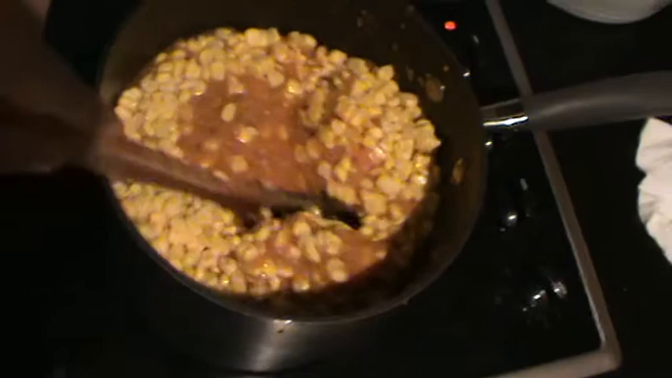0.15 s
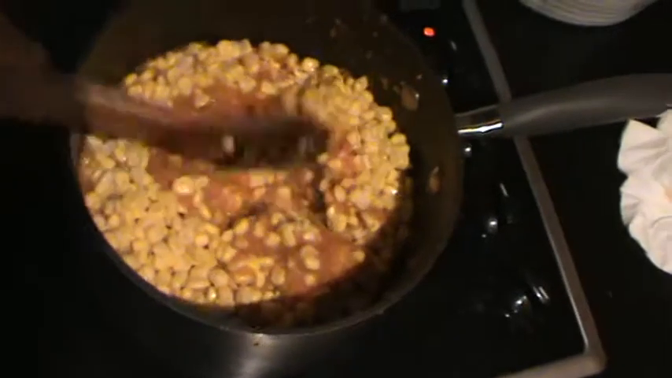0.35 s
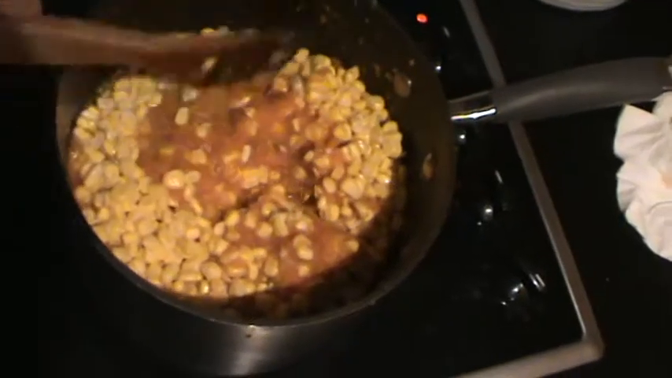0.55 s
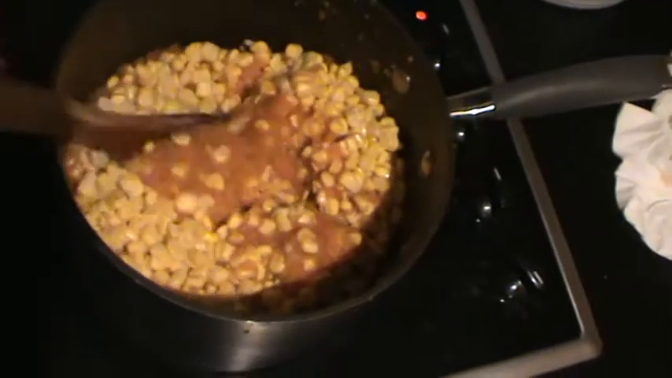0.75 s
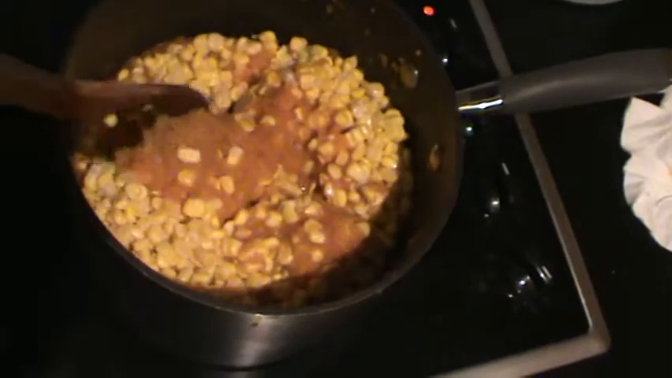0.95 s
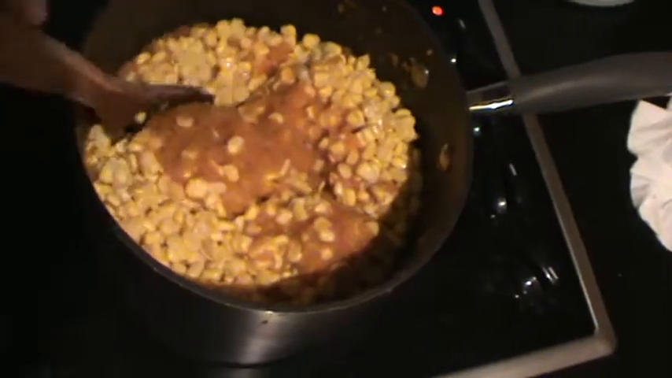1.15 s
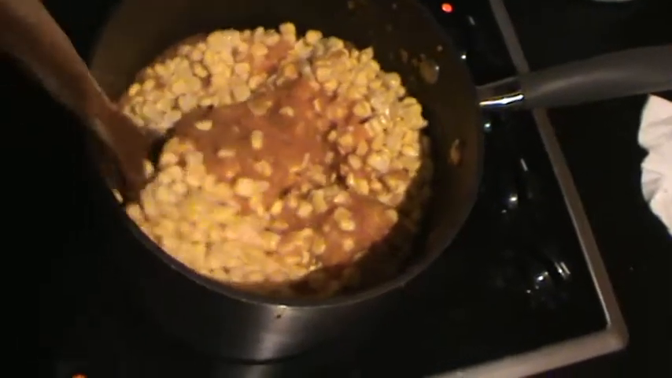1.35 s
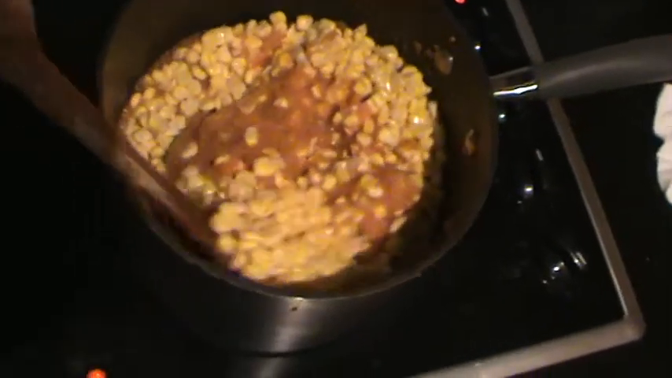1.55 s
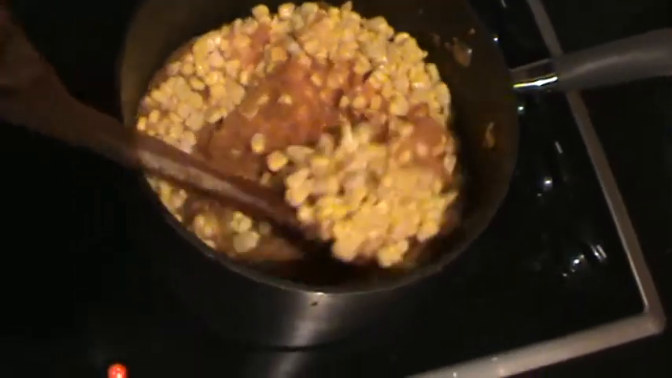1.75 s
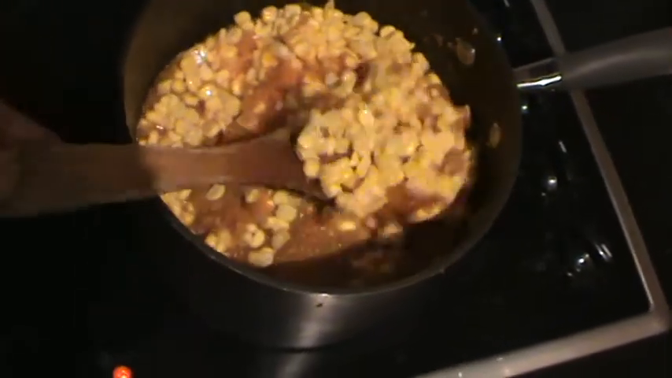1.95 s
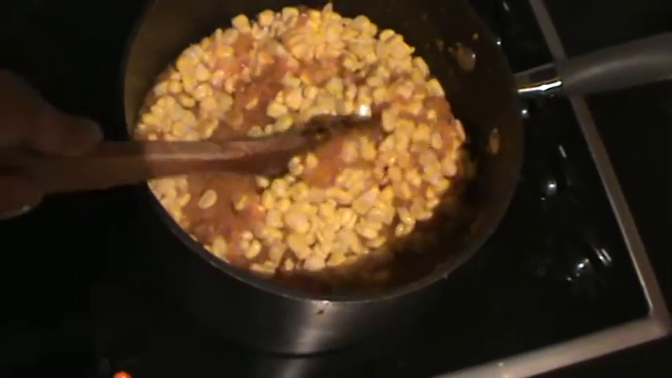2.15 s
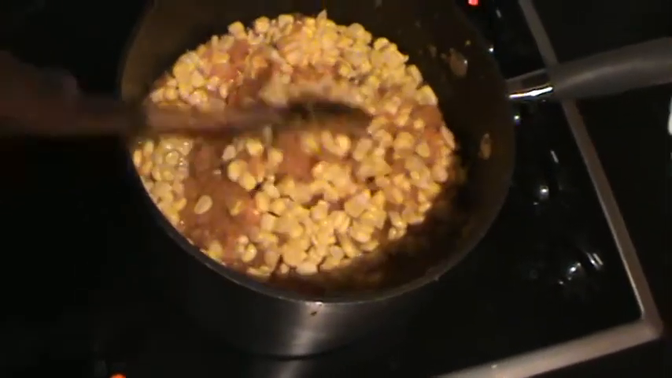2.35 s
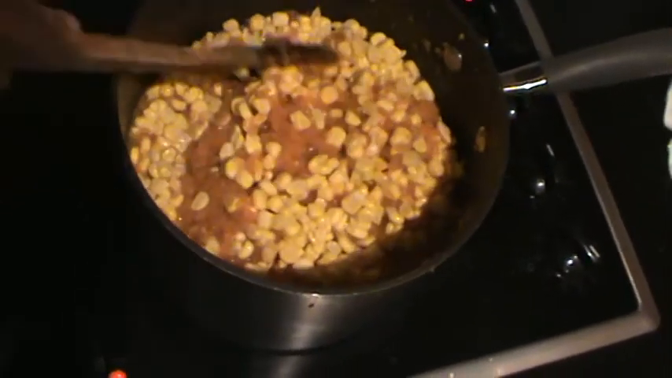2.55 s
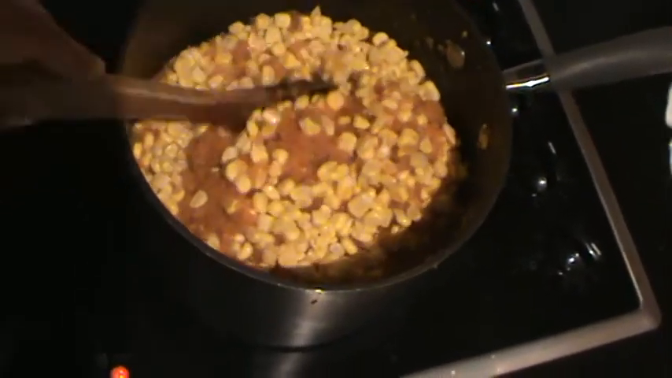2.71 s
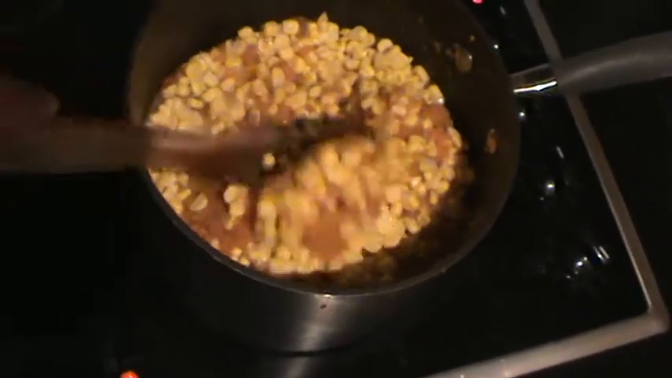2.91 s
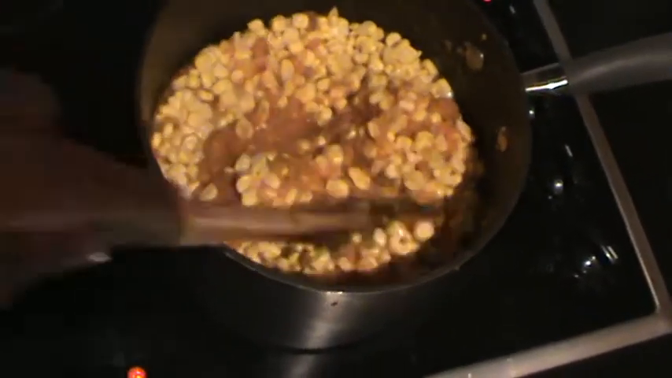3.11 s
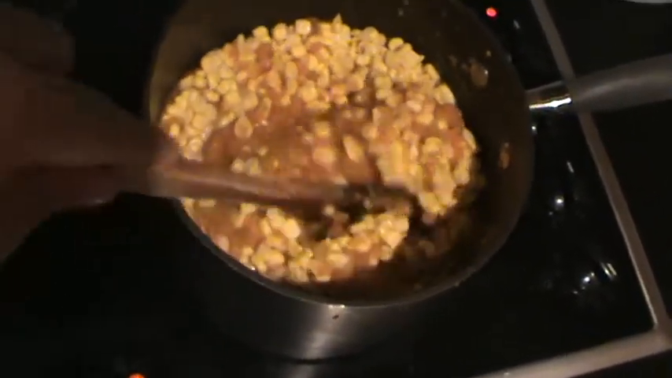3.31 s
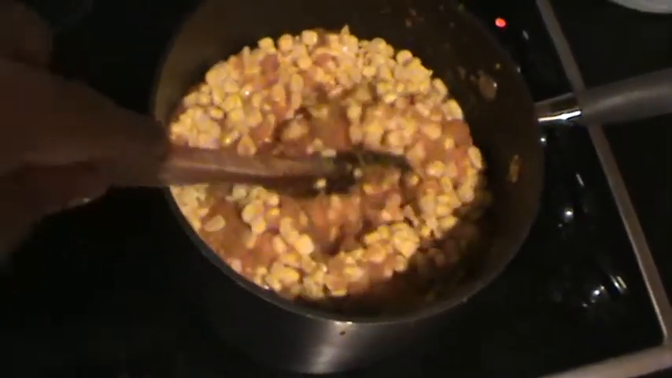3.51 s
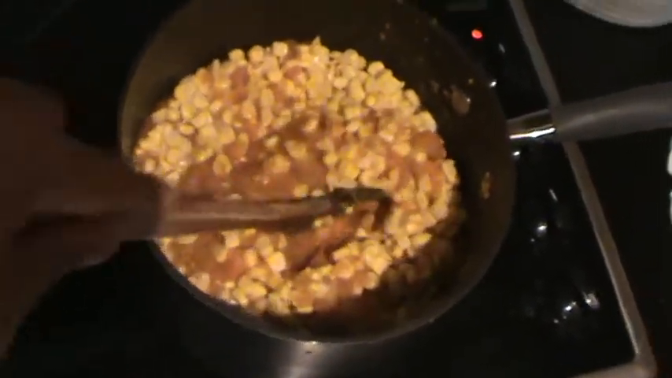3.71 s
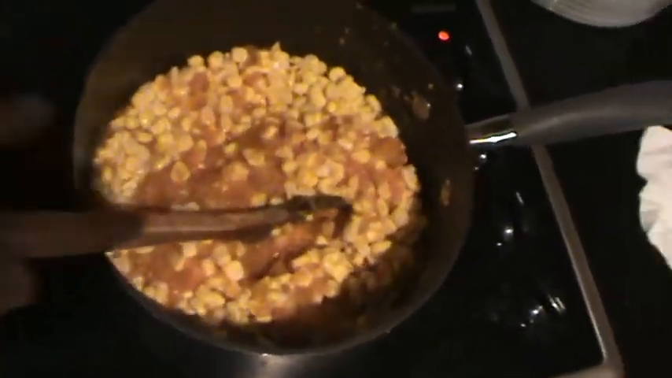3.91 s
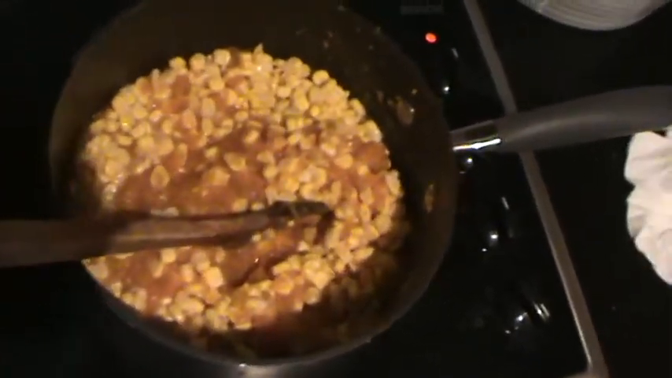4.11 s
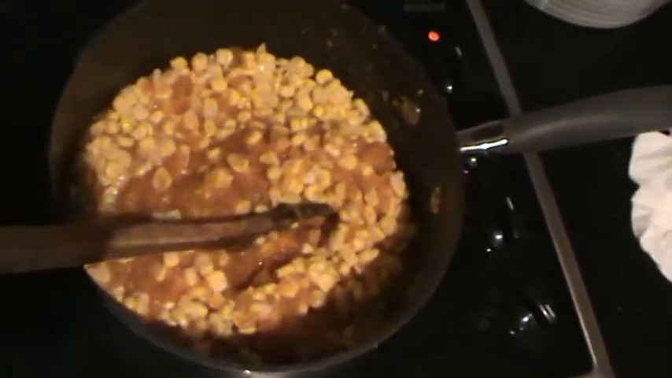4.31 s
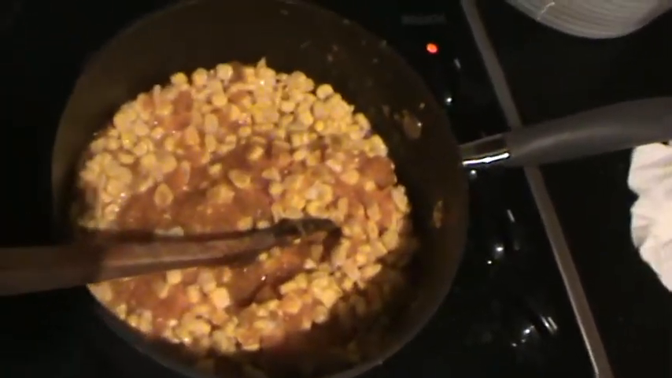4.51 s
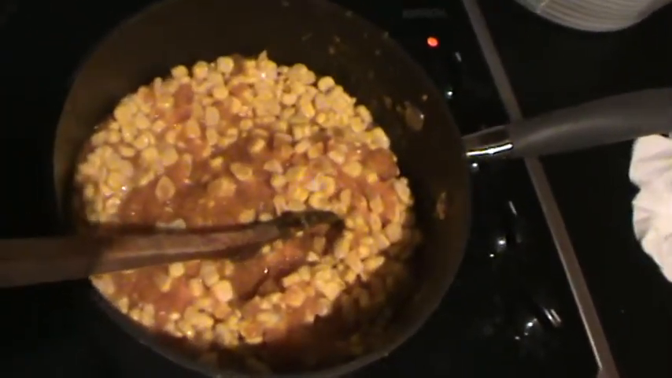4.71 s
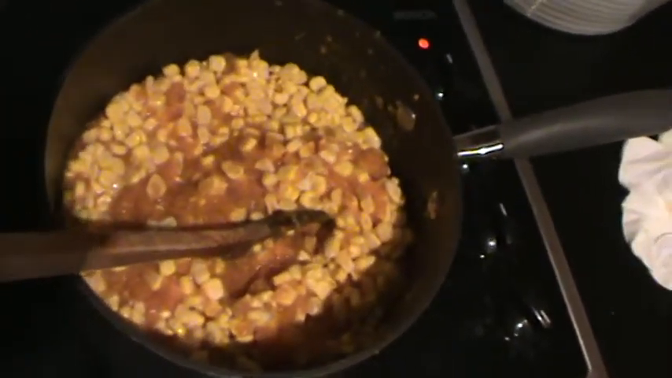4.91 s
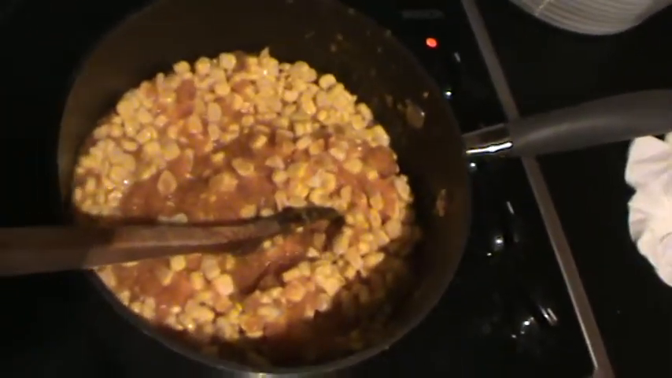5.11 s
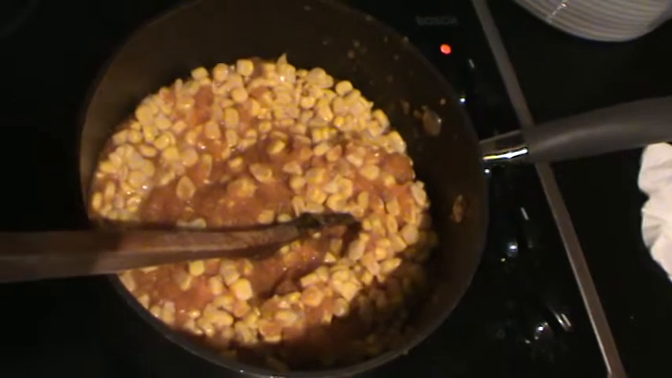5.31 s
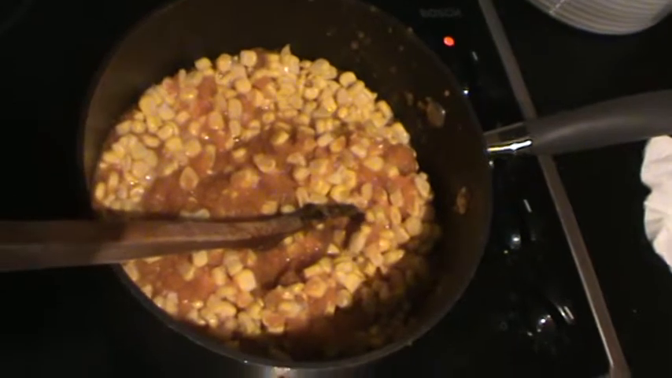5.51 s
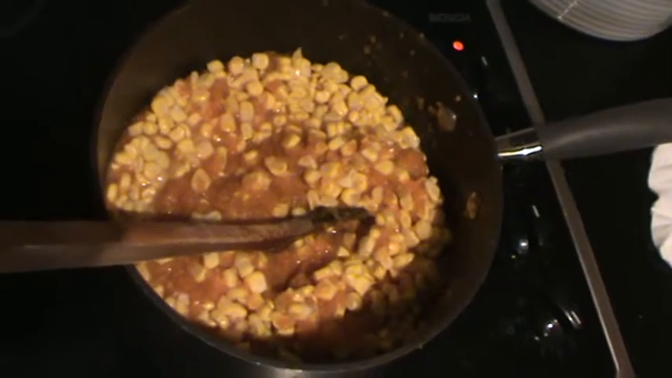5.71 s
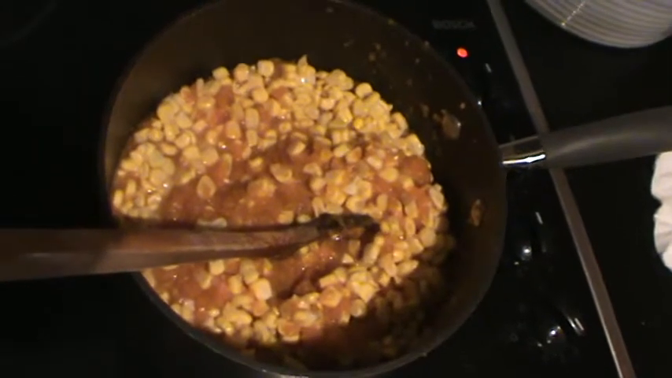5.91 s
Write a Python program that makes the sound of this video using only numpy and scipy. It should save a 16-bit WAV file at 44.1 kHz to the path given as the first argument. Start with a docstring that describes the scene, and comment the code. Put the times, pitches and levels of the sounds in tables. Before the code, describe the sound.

A wooden spoon scrapes and knocks a steel saucepan of thick wet food, with small squelchy pops, then rests, leaving faint kitchen hum and a double tick.

```python
"""Stirring a thick mixture in a saucepan

A wooden spoon stirs a thick, wet mixture in a steel saucepan on a glass hob, then rests in it.
Its knocks ring the pan as fading sine waves, with bursts of noise; its scrapes are coloured noise.
Air pockets pop as short rising tones with a little noise, and later a small double tick is heard.
A quiet kitchen hums and whines behind, made of noise and nearly steady tones.
Two microphone ports close by hear it all in stereo."""
import sys
import numpy as np
from scipy import signal
from scipy.fft import rfft, irfft, next_fast_len
from scipy.io import wavfile
from scipy.ndimage import uniform_filter1d, map_coordinates

SR = 44100
rng = np.random.default_rng(int(sys.argv[2]) if len(sys.argv) > 2 else 0)


def generate_wav(sig):
    """Save sig (samples, or channels by samples) to the path in sys.argv[1] as 16-bit PCM at SR."""
    pcm = np.round(np.clip(np.atleast_2d(sig).T, -1, 1) * 32767).astype(np.int16)
    wavfile.write(sys.argv[1], SR, pcm)


N = 267021

# All levels below are relative within their sound unless noted; "density" is level per Hz of noise.
# Kitchen appliance tones: [f/Hz, mean level/dB rms]
APPLIANCE_TONES = [(100.2, -69.5), (301.5, -73.5), (839.8, -72), (899.0, -74), (1093, -77), (1685, -74),
                   (2008, -83), (2067, -85.5), (2525, -76)]
# Colour of the air noise: [f/Hz, density/dB]
AIR_COLOUR = [(15, -46.5), (25, -10.5), (102, -5.5), (197, -18), (294, -12.5), (352, -14), (580, -12.5),
              (884, -13.5), (977, -14.5), (1150, -8.5), (1350, -15.5), (1640, -17), (3000, -21),
              (3900, -34), (6600, -120)]
# Colour of the thin hiss: [f/Hz, density/dB]
HISS_COLOUR = [(1800, -33), (3000, -4.5), (3400, -4), (3500, .5), (3750, .5), (3900, -5), (7000, -7),
               (15200, -6.5), (15800, -9)]
# How alike left and right are in the kitchen noise: [f/Hz, likeness from -1 to 1]
AIR_LIKENESS = [(60, 1), (130, 0.93), (290, 0.049), (640, -0.35), (1410, -0.34), (3100, 0.11), (6820, 0.59),
                (15000, 0.77)]
# How alike left and right are in the noise from the pan: [f/Hz, likeness from -1 to 1]
NEAR_LIKENESS = [(60, 1), (300, 1), (1000, 0.72), (4000, 0.84), (15000, 0.74)]
# The stroke over time: [t/s, scrape level/dB, 0 flat on the floor to 1 edge on the wall, rumble level/dB]
STROKE_CURVES = [(0.0, -55.5, 0.63, -54), (0.069, -56.5, 0.46, -64), (0.08, -41.5, .55, -51),
                 (0.18, -48, 0.52, -37), (0.23, -57.5, 0.26, -56.5), (0.55, -66, 0.48, -62),
                 (0.58, -47, 0.36, -50.5), (0.63, -58, 0.47, -55), (0.68, -41.5, 0.65, -51),
                 (0.755, -48, .4, -43), (0.79, -60, 0.48, -49.5), (0.9, -67, 0.29, -55.5),
                 (1.14, -59.5, .45, -62), (1.151, -44, 1, -67), (1.2, -51.5, 0.65, -51),
                 (1.26, -43, 0.42, -53), (1.31, -48, 0.4, -49.5), (1.35, -56.5, .4, -54),
                 (1.44, -48, 0.35, -63), (1.46, -44.5, 0.53, -60), (1.51, -46, 0.64, -54),
                 (1.538, -50.5, 0.32, -42.5), (1.6, -42, 0.47, -39), (1.72, -50, 0.39, -49),
                 (1.85, -57.5, 0.28, -61.5), (1.88, -53.5, 0.37, -56), (2.03, -53, .45, -50.5),
                 (2.14, -56.5, 0.7, -54.5), (2.25, -67.5, 0.33, -66), (2.39, -59.5, .6, -71),
                 (2.52, -65.5, 0.46, -70), (2.559, -55.5, 0.53, -53.5), (2.7, -58, 0.59, -66),
                 (2.72, -50, 0.32, -46), (2.85, -65.5, 0.37, -67), (3.01, -68, 0.34, -69),
                 (3.13, -57.5, .4, -61), (3.2, -62.5, .4, -62), (3.22, -48, 0.49, -52),
                 (3.255, -60.5, .4, -56), (3.29, -47, 0.18, -49), (3.35, -58.5, 0.23, -55),
                 (3.6, -62.5, 0.14, -61), (3.82, -61.5, .25, -44), (3.98, -65, 0.66, -77)]
# Colour of the spoon flat on the floor: [f/Hz, density/dB]
FLOOR_COLOUR = [(290, -11.5), (500, -15.5), (760, -3), (817, -8.5), (1010, -7.5), (1610, -10), (1760, -21),
                (2250, -32), (2520, -18.5), (4370, -18.5), (6930, -22.5), (10100, -17.5), (15800, -26)]
# Colour of the spoon's edge on the wall: [f/Hz, density/dB]
WALL_COLOUR = [(290, -38), (500, -18), (687, -9), (760, -8), (1210, -10), (1280, -9), (1600, -0.5),
               (2210, 0), (2490, -5.5), (4370, -0.5), (6740, -5.5), (10500, -14.5), (15800, -51)]
# Colour of the low rumble of pan and stove: [f/Hz, density/dB]
RUMBLE_COLOUR = [(15, -36), (25, -3), (109, 3.5), (213, -14), (267, -30), (301, 1.5), (377, -11),
                 (583, -14.5), (628, -14), (900, -42.5), (1170, -35), (1980, -120)]
# Where the pan sings under friction: [f/Hz, width/Hz, level/dB]
SINGING_BANDS = [(1304, 8.5, -8), (1560, 30, -6), (1930, 43, -12.5), (2278, 39, -0.5), (2715, 43, 0.5),
                 (3200, 41, -5.5), (3774, 130, -8), (4230, 110, -6.5), (4750, 73, -8), (5190, 72, -9),
                 (6120, 115, -8), (8700, 80, -7.5), (9210, 67, -5.5), (10000, 156, -8), (11300, 90, -3.5)]
# Blows of the spoon, each followed by the pan slamming onto the hob: [t/s, clack level/dB,
# thud, ring, knock and crack levels/dB above the clack, slam delay/s, slam f/Hz]
BLOWS = [(0.0738, -29, 5, 4, -2, -22, 0.0099, 137), (0.6754, -13.5, -10.5, 1.5, -5.5, -32, 0.0081, 143),
         (1.1529, -15, -7, -5.5, -3.5, -18.5, 0.0077, 125), (2.7131, -39, 8, 11.5, -1, -2.5, 0.008, 156),
         (3.2119, -38, 10.5, 8, 1.5, -9.5, 0.0193, 130), (3.6453, -35.5, -1, 6.5, 11.5, -7, 0.0057, 180),
         (3.7663, -38, 6, 8.5, 10, -20.5, 0.0084, 162)]
# Ringing of the loaded pan and the hob under it: [f/Hz, level/dB, time to fall 60 dB/s]
PAN_MODES = [(45, -7.5, 0.65), (99.8, 6.5, 0.24), (142.5, 2.5, 0.17), (207, 2.5, 0.071), (301.2, -5, 0.27),
             (311.3, 0, 0.28), (392, -19, 0.1), (485.6, 0.5, 0.086), (587, 1.5, 0.062), (707, 1, 0.066),
             (862, -3, 0.041), (918, -5.5, 0.05), (1049, -7, 0.097), (1210, -12, 0.063), (1519, -6, 0.053),
             (2182, -1.5, 0.076)]
# How fast the shudder after a blow dies: [f/Hz, time to fall 60 dB/s]
SHUDDER_FADE = [(50, 0.27), (130, 0.75), (350, 0.2), (920, 0.23), (2400, 0.11), (6400, 0.0824)]
# Colour of the shudder: [f/Hz, density/dB]
SHUDDER_COLOUR = [(15, -32.5), (25, -13.5), (146, -4.5), (236, -15.5), (312, -1.5), (438, -9), (866, -14),
                  (1060, -16.5), (1780, -19), (3000, -38), (3900, -68.5), (6600, -120)]
# The pan's base meeting the glass: [multiple of slam f, level/dB, slam cycles to fall 60 dB]
SLAM_MODES = [(.6, -5, 5.3), (1.05, 7.5, 5.5)]
# Colour of the brief crack: [f/Hz, density/dB]
CRACK_COLOUR = [(1180, -34), (2000, -7), (4030, -1), (5650, -8), (6320, -5.5), (13500, -15), (15800, -23)]
# Stereo width of a blow: [f/Hz, share of the bass lead, left minus right level/dB per radian of lead]
BLOW_WIDTH = [(70, 1, -6.5), (110, 1, 0), (200, .8, -1.5), (300, .5, 2.5), (450, .8, 1.5), (800, 0, 0)]
# How the kitchen's echo dies: [f/Hz, time to fall 60 dB/s]
ECHO_FADE = [(200, 0.28), (2000, 0.73), (10000, 0.32)]
# Air pockets bursting at set times, loud and quiet: [t/s, level/dB, starting pitch f/Hz]
TIMED_POPS = [(0.1391, -29.5, 2660), (0.165, -27.5, 6300), (0.178, -26.5, 5230), (0.278, -37.5, 6330),
              (0.3888, -33.5, 8800), (0.3716, -42, 9000), (0.4104, -39.5, 10800), (0.5666, -28, 3320),
              (0.5698, -26.5, 6050), (0.5714, -31.5, 10070), (0.638, -31.5, 726), (0.661, -31, 4170),
              (0.704, -30, 11500), (0.8046, -35.5, 9900), (0.9462, -36, 9350), (1.081, -37, 8750),
              (1.1244, -43, 4560), (1.7992, -32.5, 4050), (1.9297, -39, 2030), (2.042, -28, 615),
              (2.044, -34.5, 2850), (2.0845, -39, 9000), (2.099, -38, 5240), (2.1242, -27.5, 6200),
              (2.1438, -34.5, 3200), (2.163, -46, 12000), (2.335, -37.5, 4600), (2.3694, -37, 5250),
              (2.392, -36.5, 5170), (2.4157, -37, 4090), (2.4365, -30.5, 4300), (2.4854, -43, 13100),
              (2.5085, -40, 11300), (2.5374, -32.5, 5940), (2.5545, -26.5, 3840), (2.605, -26, 3430),
              (2.6237, -35, 2560), (2.6822, -32, 3600), (2.694, -40, 2520), (2.7585, -35.5, 7800),
              (2.777, -37, 4400), (2.8112, -36, 3720), (2.7894, -41, 9240), (2.838, -40, 10500),
              (2.9077, -39, 11000), (2.9882, -32.5, 9800), (3.106, -40, 1450), (3.1336, -41, 6390),
              (3.2575, -35.5, 4160), (3.271, -31, 12800), (3.28, -31.5, 810), (3.282, -26.5, 10000),
              (3.2883, -37.5, 2000), (3.3054, -28.5, 9800), (3.3868, -40, 2420), (3.405, -41, 5750),
              (3.4683, -38, 6500), (3.478, -37.5, 3460), (3.647, -38, 4000), (3.775, -41, 12500),
              (3.9977, -35, 5800)]
# A small double tick nearby: [t/s, level/dB]
TICK_TIMES = [(4.88, -46), (4.896, -43)]
# Ringing of each tick: [f/Hz, level/dB, time to fall 60 dB/s]
TICK_RINGING = [(230, -5, .07), (305, 0, .07), (500, -3, .04), (750, -6, .03), (1050, 0, .035),
                (1400, -8, .025), (2030, -2, .03), (2750, -9, .025)]
# How much sooner the left port hears the pan: [f/Hz, phase lead/radians]
LEFT_LEAD = [(40, .05), (150, .2), (400, .3), (800, .5), (2300, .35), (5000, .1), (15000, 0)]
# How much louder the left port hears the pan: [f/Hz, left minus right level/dB]
LEFT_LEAN = [(60, 0), (300, 1), (1200, 1.1), (5000, 0.5), (15000, -0.5)]

AIR_DB, HISS_DB = -61, -64.8  # air level before its slow wobble, hiss level (rms)
SOFT_DB = -40.5  # clack level at which the added bass lead is zero
SLAM_DB, SLAM_GROWS = -31.5, 0.62  # slam level at SOFT_DB; dB gained for each dB of clack
LEAD_PER_DB = 0.0205  # radians the bass leads on the left, before its share, per dB above SOFT_DB
POP_T60_S, POP_SHORTENS = 0.0099, 0.6  # time for a 1 kHz pop to fall 60 dB; power by which pitch shortens it
POP_LEAN_DB, POP_SCATTER_DB = 0.5, 3  # left minus right: mean and spread
SNAP_DB, LINGER_DB = -5, -13.5  # relative to the blip
FAINT_COUNT = 130  # small pockets bursting at random while the spoon moves
FAINT_DB, FAINT_SPREAD_DB = -54, 10  # the weakest of them, range above it
FAINT_HZ, FAINT_OCTAVES = 5520, 0.76  # middle pitch and spread
TOP_HZ = 15830  # upper band limit
SIDE = np.array([[.5], [-.5]])  # shares a left-right difference between the two ports


def amp(db):
    """Turns decibels into gain."""
    return 10 ** (np.asarray(db) / 20)


def unit(x):
    """Scales a sound to rms 1."""
    return x / np.sqrt(np.mean(x ** 2) + 1e-20)


def along(points, hz):
    """Reads a value between (Hz, value) points on a log frequency axis."""
    f, value = np.transpose(points)
    return np.interp(np.log(hz + 1), np.log(f + 1), value)


def wobble(rate):
    """Draws a smooth random curve through a given number of random points a second."""
    knots = rng.standard_normal(int(N * rate / SR) + 4)
    return map_coordinates(knots, [np.arange(N) * rate / SR])


def filtered(x, response):
    """Multiplies each frequency of x by a complex response."""
    m = next_fast_len(x.shape[-1] + 8192)
    changed = rfft(x, m) * response(np.fft.rfftfreq(m, 1 / SR))
    return irfft(changed, m)[..., :x.shape[-1]]


def half_angle(alike, hz):
    """Half the angle whose cosine is the left-right likeness."""
    return np.arccos(np.clip(along(alike, hz), -1, 1)) / 2


def spread(pair, spectrum, alike):
    """Colours two unrelated signals and mixes them to a left and right of the given likeness."""
    def response(hz):
        turn = half_angle(alike, hz)
        return amp(along(spectrum, hz)) * [np.cos(turn), np.sin(turn)]

    mid, side = filtered(pair, response)
    return np.array([mid + side, mid - side])


def dying(t60s, seconds):
    """Makes two noises in which each frequency dies at its own speed."""
    noise = rng.standard_normal((2, int(seconds * SR)))
    hz, t, z = signal.stft(noise, SR, nperseg=512)
    fade = amp(-60 * t / np.abs(along(t60s, hz))[:, None])
    return signal.istft(z * fade, SR, nperseg=512)[1]


def add(track, sound, s):
    """Mixes a sound into the track from time s."""
    piece = track[:, round(s * SR):][:, :sound.shape[-1]]
    piece += sound[..., :piece.shape[-1]]


def ring(modes, t, attack_cycles, scatter_db):
    """Sums fading sine waves, each at a new strength; the minus sign means struck inward."""
    hz, db, t60 = np.transpose(modes)[:, :, None]
    db = db + scatter_db * rng.standard_normal(db.shape)
    swell = 1 - np.exp(-t * hz / attack_cycles)
    return -np.sum(amp(db - 60 * t / t60) * swell * np.sin(2 * np.pi * hz * t), axis=0)


def resonance(f, hz, width_hz):
    """Gives the response of one resonance, 1 at its centre."""
    return 1j * f * width_hz / (hz * hz - f * f + 1j * f * width_hz)


def patchy(depth_db):
    """Makes two noises whose strength varies in patches over pitch and time."""
    z = signal.stft(rng.standard_normal((2, N)), nperseg=256)[2]
    field = uniform_filter1d(rng.standard_normal(z.shape[1:]), size=5, axis=0)
    field = uniform_filter1d(field, size=10, axis=1)
    return signal.istft(z * amp(depth_db * unit(field)), nperseg=256)[1][:, :N]


def kitchen():
    """Air noise, a thin hiss and nearly steady tones, whose phase differs between the two ports."""
    t = np.arange(N) / SR
    air = unit(spread(rng.standard_normal((2, N)), AIR_COLOUR, AIR_LIKENESS))
    hiss = unit(spread(rng.standard_normal((2, N)), HISS_COLOUR, AIR_LIKENESS))
    out = amp(AIR_DB + 0.13 * wobble(3.26)) * air + amp(HISS_DB) * hiss
    for hz, db in APPLIANCE_TONES:
        apart = 2 * half_angle(AIR_LIKENESS, hz) * SIDE
        level = np.sqrt(2) * amp(db + 1.5 * wobble(3.83))  # root 2 turns rms into peak
        out += level * np.sin(2 * np.pi * hz * t + 0.74 * wobble(2.996) + apart)
    return out


def scrape(edge):
    """Wood drags over steel: the hiss changes colour with the spoon's angle and makes the pan sing."""
    grit = amp(wobble(60) + wobble(400))  # the contact catches and slips a little
    floor = unit(spread(grit * patchy(1.4), FLOOR_COLOUR, NEAR_LIKENESS))
    wall = unit(spread(grit * patchy(3.3), WALL_COLOUR, NEAR_LIKENESS))
    hiss = np.sqrt(1 - edge) * floor + np.sqrt(edge) * wall

    def singing(f):
        return .5 + sum(amp(db) * resonance(f, hz, width) for hz, width, db in SINGING_BANDS)

    return unit(filtered(hiss, singing))


def rumble():
    """An uneven low noise of pan and stove, under the stroke and after blows."""
    uneven = amp(2.7 * wobble(31)) * rng.standard_normal((2, N))
    return unit(spread(uneven, RUMBLE_COLOUR, NEAR_LIKENESS))


def stroke():
    """Scrape and rumble follow their level curves until the spoon stops."""
    t = np.arange(N) / SR
    s, *columns = np.transpose(STROKE_CURVES)
    scrape_db, edge, rumble_db = (np.interp(t, s, column) for column in columns)
    moving = np.clip((s[-1] - t) / 0.013, 0, 1)  # fades out over the last 13 ms
    sound = amp(scrape_db) * scrape(np.clip(edge, 0, 1)) + amp(rumble_db) * rumble()
    return moving * sound


def shudder(weight, t):
    """The hob trembles after a blow: noise that swells fast and dies at a speed set by its pitch."""
    colour = [(hz, level + along(weight, hz)) for hz, level in SHUDDER_COLOUR]
    noise = spread(dying(SHUDDER_FADE, 0.97), colour, NEAR_LIKENESS)
    return noise[:, :len(t)] * (1 - np.exp(-t / 0.0031))


def crack(db, t):
    """The spoon hits the pan with a very short burst of bright noise."""
    noise = spread(rng.standard_normal((2, len(t))), CRACK_COLOUR, NEAR_LIKENESS)
    return unit(noise) * amp(db - 60 * t / 0.032)


def slam(slam_hz, t):
    """The lifted pan lands on the glass with two low, quickly fading tones."""
    modes = [(k * slam_hz, level, life / slam_hz) for k, level, life in SLAM_MODES]
    return ring(modes, t, 0.11, 0.66)


def widened(blow, lead):
    """Makes the bass differ in phase and level between the ports, more so for harder blows."""
    wide_hz, share, lean_db = np.transpose(BLOW_WIDTH)

    def response(f):
        gain = amp(SIDE * lead * np.interp(f, wide_hz, lean_db))
        return gain * np.exp(1j * SIDE * lead * np.interp(f, wide_hz, share))

    return filtered(blow, response)


def knocks():
    """Each blow rings the pan and cracks briefly; the pan lifts, slams down and the hob shudders."""
    out, t = np.zeros((2, N)), np.arange(SR * 2 // 3) / SR
    for s, db, thud_db, ring_db, knock_db, crack_db, delay, slam_hz in BLOWS:
        hardness_db = db - SOFT_DB
        slam_db = SLAM_DB + SLAM_GROWS * hardness_db - db  # relative to the clack
        # how strongly this blow drives each pitch range: (Hz, dB)
        weight = [(200, thud_db), (280, ring_db), (400, ring_db), (480, knock_db),
                  (750, knock_db), (1000, 0), (1600, 0), (2200, crack_db)]
        struck = [(hz, level + along(weight, hz), t60) for hz, level, t60 in PAN_MODES]
        trembling = amp(16.5) * shudder(weight, t)
        cracking = amp(1) * crack(crack_db, t)
        blow = amp(-7.0) * ring(struck, t, 0.26, 0.76) + trembling + cracking
        add(blow, amp(slam_db) * slam(slam_hz, t), delay)
        # 20 ms of silence in front leaves room for the port that hears it earlier
        padded = np.pad(blow, ((0, 0), (SR // 50, 0)))
        add(out, amp(db) * widened(padded, LEAD_PER_DB * hardness_db), s - 1 / 50)
    return out


def walls(x):
    """The kitchen answers with fading noise; each quarter second of sound gets a new tail."""
    out, step = np.zeros((2, N)), SR // 4
    for k in range(0, N, step):
        tail = dying(ECHO_FADE, .4)
        tail = tail / np.linalg.norm(tail[0])
        add(out, signal.fftconvolve(x[:, k:k + step], tail, axes=1), k / SR + 0.006)  # 6 ms late
    return out


def blip(hz, t60, t):
    """A bursting pocket gives a short tone that rises as the pocket shrinks."""
    tone = np.sin(2 * np.pi * hz * t * (1 + 0.059 * t / t60))
    return tone * amp(-60 * t / t60) * (1 - np.exp(-t * hz / 0.75))


def snap(hz, t):
    """The skin of the pocket tears: a tiny burst of noise centred a little above the pitch."""
    noise = amp(SNAP_DB - 60 * t / 0.00324) * rng.standard_normal(len(t))
    return filtered(noise, lambda f: resonance(f, 1.2 * hz, 1.3 * hz) ** 2)


def linger(hz, t60, t):
    """The hollow of the pan keeps the pitch a while, as noise in a narrow band."""
    noise = rng.standard_normal(len(t)) + 0.14 * rng.standard_normal((2, len(t)))
    band = unit(filtered(noise, lambda f: resonance(f, hz, .25 * hz) ** 2))
    return band * amp(LINGER_DB - 60 * t / (.03 + 4 * t60)) * (1 - np.exp(-t / .0015))


def mixture():
    """Air pockets burst, small and high or large and low; higher ones die sooner."""
    out, t = np.zeros((2, N)), np.arange(SR // 10) / SR
    when = rng.random(FAINT_COUNT) * STROKE_CURVES[-1][0]
    faint_db = FAINT_DB + FAINT_SPREAD_DB * rng.random(FAINT_COUNT)
    pitch = FAINT_HZ * 2 ** (FAINT_OCTAVES * rng.standard_normal(FAINT_COUNT))
    faint = zip(when, faint_db, np.minimum(pitch, TOP_HZ))
    for s, db, hz in list(TIMED_POPS) + list(faint):
        t60 = POP_T60_S * (hz / 1000) ** -POP_SHORTENS
        lean_db = POP_LEAN_DB + POP_SCATTER_DB * rng.standard_normal()
        pop = blip(hz, t60, t) + snap(hz, t) + linger(hz, t60, t)
        add(out, amp(db + lean_db * SIDE) * pop, s)
    return out


def ticks():
    """Something small and hard touches down twice, ringing briefly each time."""
    out, t = np.zeros((2, N)), np.arange(SR // 8) / SR
    for s, db in TICK_TIMES:
        add(out, amp(db) * ring(TICK_RINGING, t, 0.96, 1.9), s)
    return out


def placed(x):
    """Sets the pan a little to the left: at most pitches louder and earlier in that port."""
    def response(hz):
        return amp(SIDE * along(LEFT_LEAN, hz)) * np.exp(1j * SIDE * along(LEFT_LEAD, hz))

    return filtered(x, response)


def scene():
    """Adds the nearby sounds, the echo of all but the stroke, and the kitchen."""
    sharp = knocks() + mixture() + ticks()
    near = placed(sharp + stroke())
    return near + amp(-11) * walls(sharp) + kitchen()


def record(dry):
    """Keeps only what lies below the upper band limit."""
    return filtered(dry, lambda hz: hz < TOP_HZ)


dry = scene()
out = record(dry)
generate_wav(out)
```